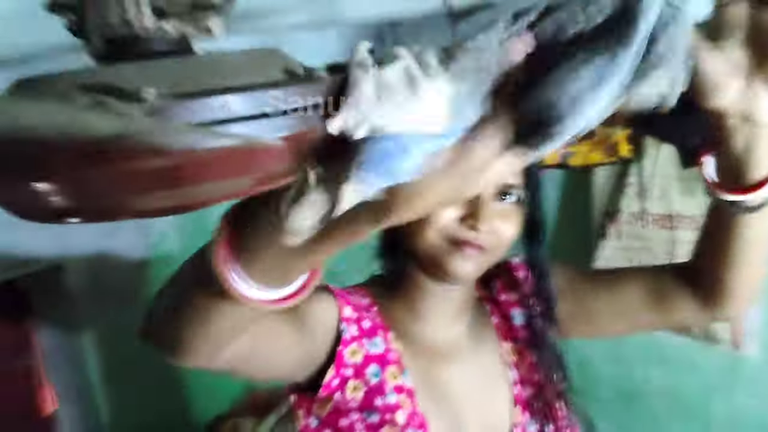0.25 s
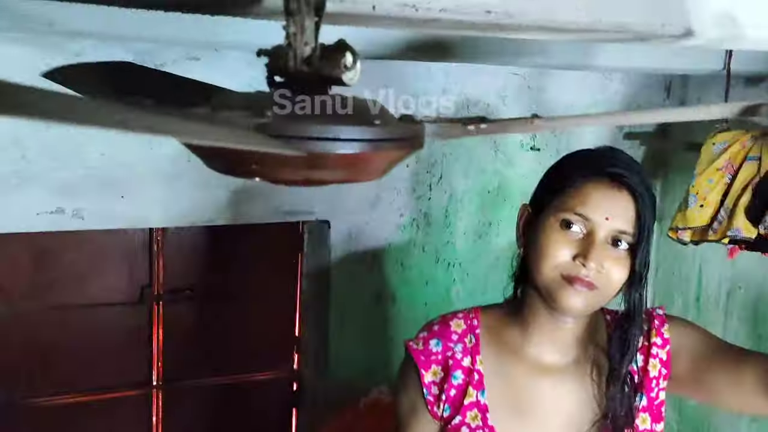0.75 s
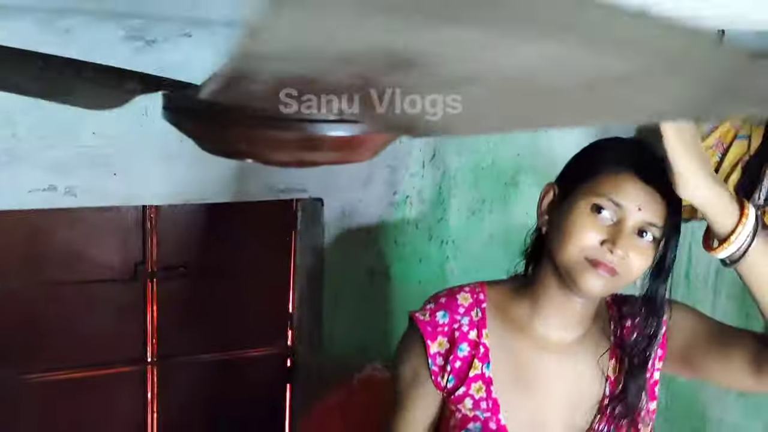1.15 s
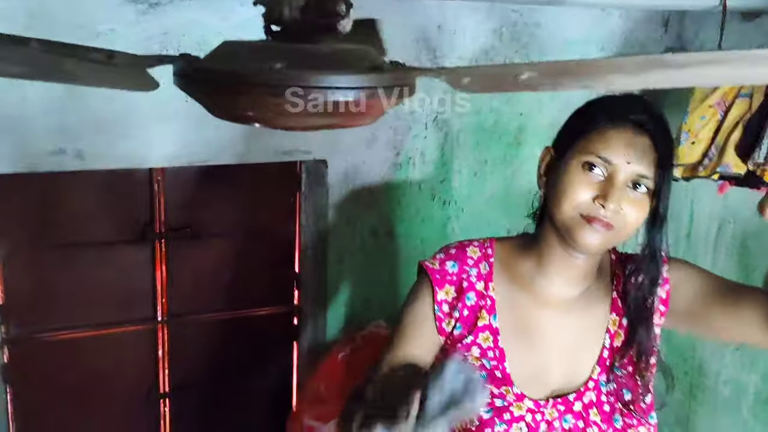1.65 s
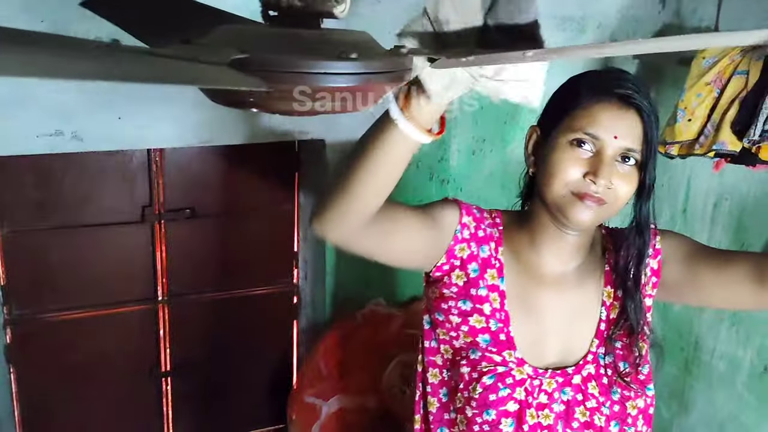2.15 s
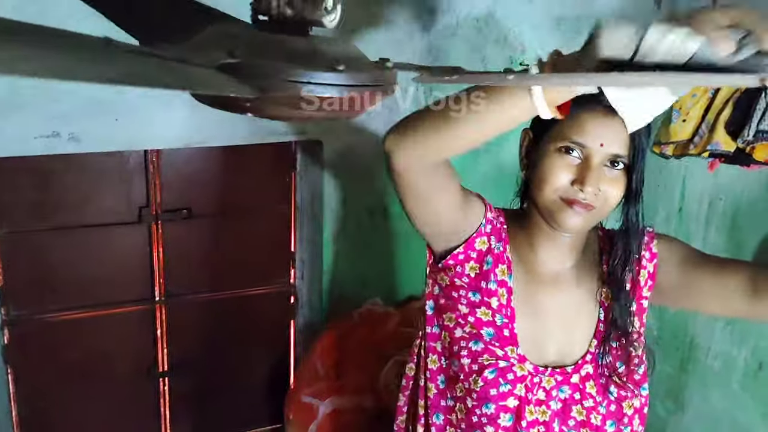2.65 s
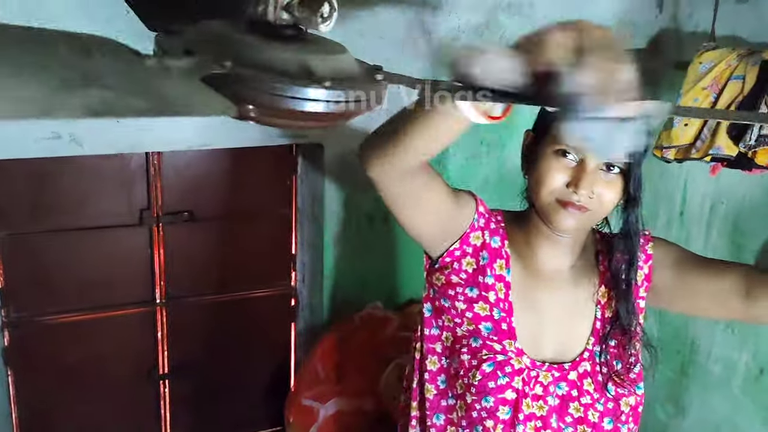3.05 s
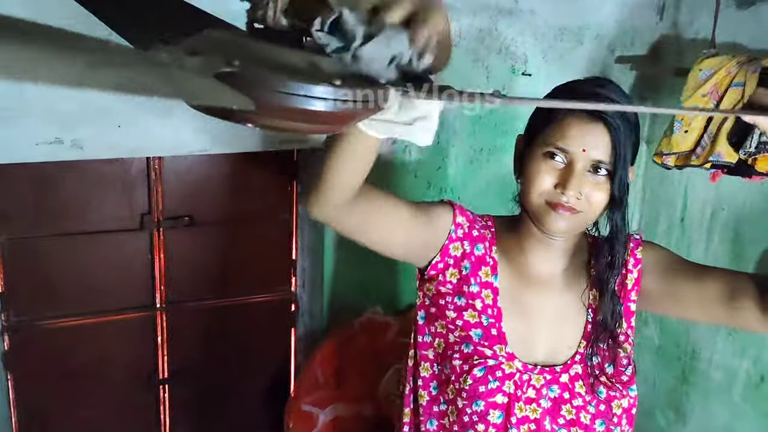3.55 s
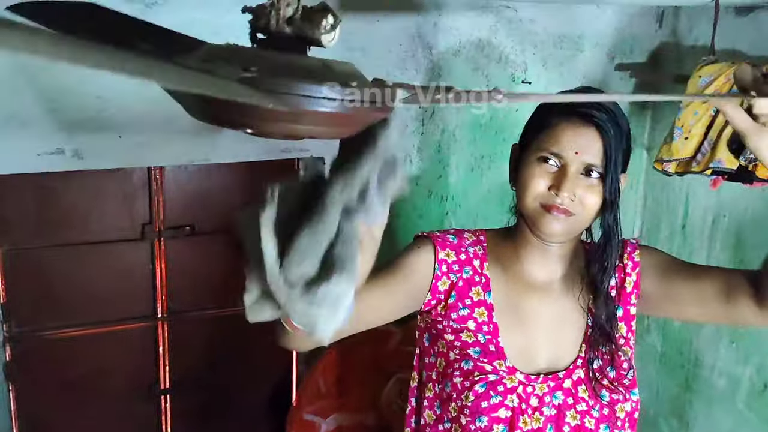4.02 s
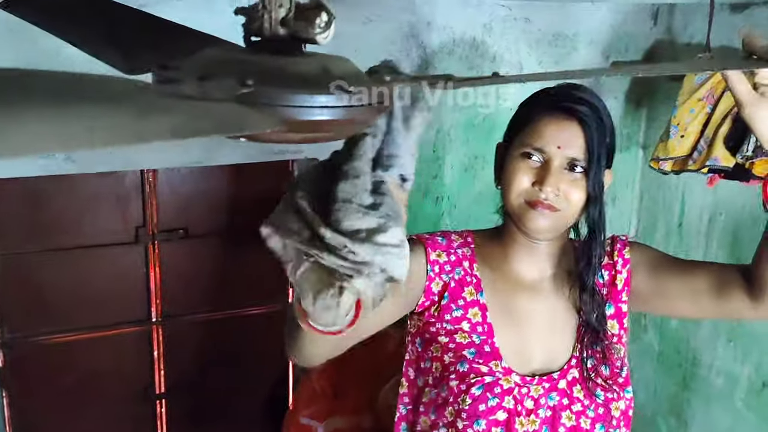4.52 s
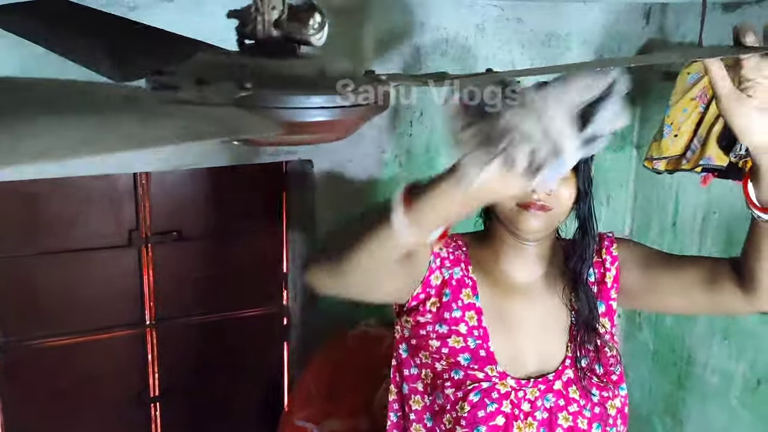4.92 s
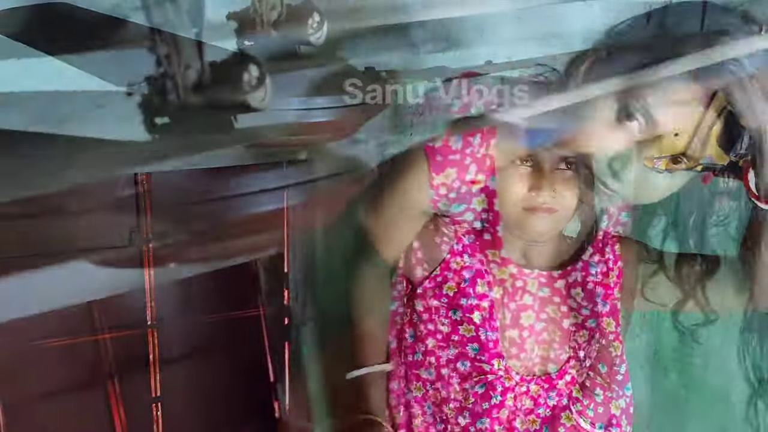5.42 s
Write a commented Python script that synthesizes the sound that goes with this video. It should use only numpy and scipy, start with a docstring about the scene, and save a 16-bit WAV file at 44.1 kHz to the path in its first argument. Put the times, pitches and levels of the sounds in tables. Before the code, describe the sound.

Close, gritty cloth wiping on thin metal blades, interrupted by a hard jolt, light pats, rattling bangles, hollow knocks and tiny creaks.

```python
"""A dry cloth wipes the sheet-metal blades of a ceiling fan in a small room, close to a phone with two ports.
Catching fibres, as shaped noise, rasp and ring the blade from the start; early on, pushes ring the phone case.
Damped modes then make blade knocks, bangle clashes and dry ticks; the wiping moves to a second blade.
Light pats and a sine creak follow, then firmer strokes, more clashes, the hardest knocks and another creak.
Two faint falling whistles of a bird come near the end; noise-band rumble and a room hiss run throughout."""
import sys
import numpy as np
from scipy import signal
from scipy.fft import rfft, irfft
from scipy.io import wavfile
from scipy.ndimage import uniform_filter1d

SR = 44100
rng = np.random.default_rng(int(sys.argv[2]) if len(sys.argv) > 2 else 0)


def output_pcm(signal):
    """Save a mono or channel-first signal as 16-bit PCM at the path in sys.argv[1].

    Samples are clipped to [-1, 1] before scaling.
    """
    pcm = np.clip(np.atleast_2d(signal).T, -1, 1) * 32767
    wavfile.write(sys.argv[1], SR, np.round(pcm).astype(np.int16))


N = 250488
T = np.arange(N) / SR  # s

# cloth strokes: (full grip [s], hold [s], level at grip [dB], level at letting go [dB], release [dB/s],
# lowest blade ring [dB], second blade ring [dB], upper blade rings [dB], brightness [dB], hand weight [dB])
STROKES = [(0.057, 0.18, -43.5, -39, 295, -18, 1, 11, 4, -15),
           (0.382, .15, -44, -34.5, 1500, -11, 4, 6, 2.5, -14),
           (0.545, 0.041, -45.5, -45, 284, -12, -26, -2, 0.5, -11),
           (0.724, 0.098, -63, -54, 116, -3, -4, -13, 2, -10),
           (0.887, 0.068, -51, -43.5, 2499, -7, 2, 0, 0.5, -13),
           (2.253, 0.08, -65.5, -65, 102, -1, -5, -12, 1, -9.5),
           (2.425, 0.045, -69, -65, 150, 3, -18, -14, -3, 0),
           (2.716, 0.15, -54, -50, 287, 0.5, -7, -1, 0, -8.5),
           (3.037, .14, -45, -40, 256, -5.5, -31, -3, 2, -16),
           (3.346, 0.13, -47, -45.5, 256, -0.5, -13, -3, 1, -12),
           (3.678, 0.15, -42, -44, 395, -4, -17, 4, 4.5, -13.5),
           (4.16, .04, -43.5, -43, 198, 5, 4, -4, -1, -7),
           (4.25, 0.071, -36.5, -41.5, 326, 8.5, -4, 1.5, -4, -10),
           (4.437, 0.042, -64.5, -67, 200, 5, -21, 4, -2, -4),
           (4.584, 0.064, -67, -60, 157, 0.5, 0, -6, 0.5, -4),
           (4.834, 0.028, -64.5, -65, 202, 0, 8, 0, -2, -4),
           (5.024, 0.033, -77, -80.5, 149.5, -9, -1, 0, 5, -14),
           (5.104, .065, -68.5, -72, 300, -9, -4.5, 2, -4.5, -18),
           (5.244, 0.077, -66.5, -61, 150, 0, -8, 3, -0.5, -11),
           (5.365, 0.11, -49.5, -54, 254, -1, -24, 4.5, 0, -10),
           (5.633, .05, -55.5, -55.5, 250, -4, -26, 8, 1, -9.5)]
# rustle of the loose cloth between strokes: (time [s], level [dB])
RUSTLE = [(0, -54.5), (.94, -68.5), (.99, -96), (1.27, -75), (1.4, -80), (1.47, -69), (1.6, -87),
          (1.85, -84.5), (2.0, -74), (2.2, -91.5), (2.3, -81.5), (2.66, -68), (3.58, -82), (3.92, -63.5),
          (4.1, -71), (4.55, -86), (4.75, -74.5), (5.0, -90), (5.68, -68)]
# rustle colour: (lowest ring [dB], second ring [dB], upper rings [dB], brightness [dB], hand weight [dB])
RUSTLE_COLOUR_DB = (2.5, -12, -6, -1, 1.5)
# spectrum of the cloth rasp: (frequency [Hz], relative density [dB per Hz])
WEAVE_SPECTRUM = [(240, -47.5), (400, -18.5), (489, -38), (839, -11), (1060, -10), (1680, -6), (2090, -7.5),
                  (2710, -3.5), (3160, -7), (5270, -14.5), (7630, -31.5), (10700, -23.5), (16000, -40.5)]
# low blade modes under the cloth: (frequency [Hz], width [Hz])
BLADE_LOW_MODES = [(1320, 80), (1690, 65)]
# upper modes, one list per blade: (frequency [Hz], width [Hz], relative level [dB])
BLADE_UPPER_MODES = [
    [(2256, 20, -4.5), (2780, 220, 10), (3940, 28, -7), (4400, 42, -14), (4960, 170, -29),
     (5270, 54, -18.5), (6640, 13, -23.5)],
    [(2105, 105, 18.5), (2730, 160, -17.5), (4100, 13, 14), (4400, 60, -31), (4740, 18, -20),
     (5250, 27, -20)],
]
# level difference of the ports for the cloth: (frequency [Hz], left minus right [dB])
PORT_TILT = [(60, -5.5), (110, 9), (200, 3.5), (380, -1), (700, 2), (1290, -0.5), (2380, -8), (4400, 0),
             (8120, 10), (15000, -1)]
# likeness of the noise at the two ports: (frequency [Hz], correlation [-1 to 1])
PORT_LIKENESS = [(40, 0.63), (130, 0), (300, 0.81), (650, 0.41), (1300, 0.056), (16000, 0)]
# blade knocks: (time [s], level [dB], pitch [Hz], t60 [s], thud re knock [dB], left minus right [dB])
KNOCKS = [(0.955, -56.5, 790, 0.11, -17, -20), (3.841, -37, 796, 0.1, -14.5, -23),
          (4.1623, -34, 1318, 0.23, -22, -7), (4.177, -39, 1367, 0.054, -13, 19),
          (4.438, -57, 580, 0.12, -11, -11)]
# blade modes under a knock: (pitch ratio, relative level [dB], t60 ratio)
KNOCK_MODES = [(.36, -10, .5), (.66, -10, .5), (1, 0, 1), (2.84, -6, .35), (3.44, -20, .8)]
# dry ticks: (time [s], level [dB], centre [Hz], left minus right [dB])
TICKS = [(1.4589, -43.5, 3100, -18), (1.483, -44.5, 3400, -20), (4.7368, -53, 2900, -8)]
# bangle clashes: (time [s], level [dB], high re low rings [dB], low pitch [Hz], high pitch [Hz],
# rattle t60 [s], scrape weight [dB], left minus right [dB])
RATTLES = [(1.1827, -66, -5.5, 3560, 9960, 0.24, -12, 3), (1.91, -69, -16, 3850, 9440, 0.14, -3, -3),
           (1.938, -68, 17, 3480, 9680, 0.21, -23, 5), (1.981, -72, 14, 4080, 9910, 0.28, -15, 5),
           (2.051, -54, -18, 3870, 9550, 0.24, -8, 1), (2.585, -69, -13, 4040, 9960, 0.075, -12, 0.0),
           (2.6047, -56.5, 3, 4150, 9750, 0.2, -1, 3.5), (3.952, -58.5, -5.5, 3910, 9900, 0.18, -1, -2),
           (3.993, -53, -7, 3920, 10100, 0.2, -25, 3), (4.1234, -71, -12, 3900, 10600, 0.12, -16, 2),
           (4.1451, -50, 3.5, 3840, 9820, 0.28, -0.5, 6.5)]
# low hoop modes: (pitch ratio, relative level [dB], t60 [s])
BANGLE_LOW_MODES = [(.88, -14, .015), (1, 0, .03), (1.13, -9, .012), (1.6, -13, .015)]
# high hoop modes: (pitch ratio, relative level [dB], t60 [s])
BANGLE_HIGH_MODES = [(.74, -15, .012), (.96, -9, .01), (1, 0, .02), (1.06, -6, .01), (1.18, -8, .01),
                     (1.31, -11, .015), (1.48, -14, .012)]
# creaks of the blade on its arm: (time [s], length [s], first [Hz], last [Hz], level [dB])
CREAKS = [(2.433, 0.087, 591, 704, -62), (4.436, 0.073, 602, 684, -64.5)]
# bumps on the phone case: (time [s], level [dB], contact [s], port [0 left, 1 right], push 1 or pull -1)
JOLTS = [(.5293, -1.5, .0005, 0, 1), (.530, -12, .00035, 1, -1), (.5335, -15, .0007, 1, 1),
         (.536, -7, .003, 1, 1), (.5415, -22, .0005, 1, 1), (.547, -24, .003, 0, 1),
         (.551, -21, .003, 0, 1), (.558, -12, .0025, 0, 1), (1.258, -38, .008, 1, 1),
         (1.428, -38, .004, 1, 1)]
# case modes, one list per port (left, right): (frequency [Hz], level re push [dB], t60 [s])
CASE_MODES = [
    [(260, -19, 0.021), (428, -18.5, .03)],
    [(52.7, -1, 0.11), (140, -8, 0.024), (630, -11, .02), (960, -4, 0.024), (1650, 3.5, 0.012),
     (2300, -1, 0.015)],
]
# bird whistles: (time [s], length [s], first [Hz], last [Hz], level at the end [dB])
BIRD = [(4.92, .14, 5060, 4820, -83.5), (5.11, 0.11, 4800, 4630, -76.5)]
# rumble contour: (time [s], level [dB])
RUMBLE = [(0, -51), (.43, -56), (.62, -47.5), (1.03, -62), (1.4, -57.5), (1.75, -66.5), (2.3, -59.5),
          (3.04, -57), (3.5, -53), (4.33, -55.5), (4.9, -62.5), (5.68, -61.5)]
# spectrum of the room hiss: (frequency [Hz], relative density [dB per Hz])
ROOM_SPECTRUM = [(88, -41), (150, -9), (244, -7), (275, -12), (309, -4), (414, -13.5), (534, -16.5),
                 (730, -17), (3100, -30.5), (6390, -45.5), (16000, -45)]

ATTACK_DB_PER_S, ROUNDING_S = 351.5, 0.044  # of a full stroke with a slow release
LIGHT_DB, LIGHT_QUICKER = -58, 2.5  # strokes gripping under this level are pats that land more suddenly
NEXT_BLADE_S = 1.5
CLOTH_PAN_DB, SWAY_DB = -0.5, 0.5  # left minus right
BIRD_SWELL_DB = 7.5
ROOM_DB = -66.5
TOP_HZ = 15780


def undb(db):
    """Amplitude of a level in dB."""
    return 10 ** (np.asarray(db) / 20)


def unit(x):
    """Scale to an rms of 1."""
    return x / np.sqrt(np.mean(x ** 2))


def over_hz(table):
    """Read a (Hz, value) table at every spectrum bin, on a log frequency axis."""
    hz, value = np.transpose(table)
    bin_hz = np.arange(N // 2 + 1) * SR / N
    return np.interp(np.log(bin_hz + 1), np.log(hz), value)


def colour(x, table):
    """Filter by a (Hz, dB) table."""
    return irfft(rfft(x) * undb(over_hz(table)), N)


def band(x, hz, width_hz):
    """Pass one resonance."""
    return signal.lfilter(*signal.iirpeak(hz, hz / width_hz, SR), x)


def band_twice(x, hz, width_hz):
    """Pass one resonance with steeper skirts."""
    return band(band(x, hz, width_hz), hz, width_hz)


def walk(rate_hz):
    """Random levels held 1 / rate_hz and slewed twice; spread near 1."""
    hold = int(SR / rate_hz)
    steps = np.repeat(rng.standard_normal(N // hold + 1), hold)
    return 1.08 * uniform_filter1d(uniform_filter1d(steps, hold), hold)[:N]


def port_noise():
    """Noise at both ports, correlated by frequency as in PORT_LIKENESS."""
    likeness = np.clip(over_hz(PORT_LIKENESS), 0, 1)
    weights = np.sqrt([(1 + likeness) / 2, (1 - likeness) / 2])
    mid, side = rfft(rng.standard_normal((2, N))) * weights
    return irfft([mid + side, mid - side], N)


def pan(left_minus_right_db):
    """Left and right gains."""
    return undb(np.array([left_minus_right_db / 2, -left_minus_right_db / 2]))


def decay(t_s, t60_s):
    """Exponential fall of 60 dB in t60_s."""
    return np.exp(-np.log(1000) * t_s / t60_s)


def ring(hz, t60_s, rise_s=1e-4):
    """One damped mode, peak near 1."""
    t = T[:int(SR * (t60_s + 3 * rise_s)) + 8]
    envelope = (1 - np.exp(-t / rise_s)) * decay(t, t60_s)
    return np.sin(2 * np.pi * hz * t) * envelope / envelope.max()


def add(out, start_s, x):
    """Mix x into out from start_s."""
    i = int(start_s * SR)
    out[..., i:i + x.shape[-1]] += x[..., :out.shape[-1] - i]


def cloth():
    """Fibres catch in uneven bursts; each blade mode swells and fades as the cloth travels over its nodes."""
    power = grip()
    total_power = power.sum(0)
    colours = np.vstack([RUSTLE_COLOUR_DB, np.array(STROKES)[:, 5:]])
    first_db, second_db, upper_db, bright_db, hand_db = colours.T @ (power / total_power)

    catches = unit(undb(1.1 * walk(400) + 0.71 * walk(40))) * port_noise()
    rasp = thicket(colour(catches, WEAVE_SPECTRUM), 4.3)
    dull = signal.sosfilt(signal.butter(2, 4500, fs=SR, output="sos"), rasp)

    low_rings = 0
    for (hz, width_hz), db in zip(BLADE_LOW_MODES, (first_db, second_db)):
        mode = unit(band(band(catches, hz, width_hz), hz, 4 * width_hz))
        low_rings = low_rings + undb(db + 2.2 * walk(25.09)) * mode
    first_blade, second_blade = (upper_rings(catches, modes) for modes in BLADE_UPPER_MODES)
    upper = np.where(T < NEXT_BLADE_S, first_blade, second_blade)
    hand = unit(band_twice(catches, 310, 630))

    mix = undb(2.0) * (dull + undb(bright_db) * (rasp - dull))
    mix += undb(hand_db) * hand
    mix += undb(upper_db - 11.5) * upper
    mix += undb(-9.0) * low_rings
    return mix * np.sqrt(total_power) * pan(CLOTH_PAN_DB + SWAY_DB * walk(12))


def grip():
    """Power of the rustle and of each stroke: steady attack, sloping hold, release, corners rounded."""
    rows_db = [np.interp(T, *np.transpose(RUSTLE))]
    for grip_s, hold_s, first_db, last_db, release_db_per_s, *_ in STROKES:
        quick = LIGHT_QUICKER if first_db < LIGHT_DB else 1
        db = np.interp(T, (grip_s, grip_s + hold_s), (first_db, last_db))
        db += quick * ATTACK_DB_PER_S * np.minimum(T - grip_s, 0)
        db -= release_db_per_s * np.maximum(T - grip_s - hold_s, 0)
        rounding_s = ROUNDING_S * min(ATTACK_DB_PER_S / release_db_per_s, 1 / quick)
        rows_db.append(uniform_filter1d(db, max(int(rounding_s * SR), 1)))
    return undb(2 * np.maximum(rows_db, -200))  # twice the dB: power


def thicket(x, depth_db):
    """The thin sheet has a thicket of close modes that light up for a moment, one after another."""
    frames = signal.stft(x, nperseg=1024, noverlap=768)[2]
    lit = unit(uniform_filter1d(rng.standard_normal(frames.shape[1:]), size=12, axis=1))
    return unit(signal.istft(frames * undb(depth_db * lit), nperseg=1024, noverlap=768)[1][:, :N])


def upper_rings(catches, modes):
    """Upper modes of one blade, each wandering in level."""
    rings = 0
    for hz, width_hz, db in modes:
        rings = rings + undb(db + 2.7 * walk(20)) * unit(band(catches, hz, width_hz))
    return unit(rings)


def knocks():
    """A blow rings the blade modes over a dull thud of decaying band noise."""
    out = np.zeros((2, N))
    t = T[:SR // 10]
    for s, db, hz, t60_s, thud_db, pan_db in KNOCKS:
        thud = unit(band(rng.standard_normal((2, len(t))), 370, 260)) * np.exp(-t / 0.018)
        add(out, s, undb(db + thud_db) * pan(pan_db)[:, None] * thud)
        for ratio, mode_db, t60_ratio in KNOCK_MODES:
            mode = undb(db + mode_db) * ring(hz * ratio, t60_s * t60_ratio, 0.00085)
            add(out, s, np.outer(pan(pan_db), mode))
    return out


def ticks():
    """One short snap: a heavily damped mode and a lower one of opposite sign."""
    out = np.zeros((2, N))
    for s, db, hz, pan_db in TICKS:
        add(out, s, np.outer(pan(pan_db), -undb(db) * ring(hz, 0.0039, 2e-5)))
        add(out, s, np.outer(pan(pan_db), undb(db + 2.5) * ring(0.33 * hz, 0.0024, 2e-5)))
    return out


def bangles():
    """Each clash is a sharp contact and a dying shower of tiny ones that ring the hoops and scrape."""
    out = np.zeros((2, N))
    t = T[:SR // 4]
    for s, db, high_db, low_hz, high_hz, t60_s, scrape_db, pan_db in RATTLES:
        fade = decay(t, t60_s) * (1 + 0.5 * np.exp(-t / 0.0063))
        struck = rng.random(len(t)) < 5000 / SR  # about 5000 contacts per s
        contacts = 0.55 * fade * rng.standard_normal((2, len(t))) * struck
        contacts[:, 0] = 1.6
        hoops = ring_hoop(contacts, BANGLE_LOW_MODES, low_hz)
        hoops += undb(high_db) * ring_hoop(contacts, BANGLE_HIGH_MODES, high_hz)
        scrape = fade * band(rng.standard_normal((2, len(t))), 10500, 6000)
        clash = undb(-5.0) * hoops + undb(scrape_db + high_db) * scrape
        add(out, s, undb(db) * pan(pan_db)[:, None] * clash)
    return out


def ring_hoop(blows, modes, hz):
    """All modes of a hoop, each a little louder or softer by where it is struck."""
    body = np.zeros(SR // 4)
    for ratio, db, t60_s in modes:
        mode = ring(min(hz * ratio, .4 * SR), t60_s)
        add(body, 0, undb(db + 1.5 * rng.standard_normal()) * mode)
    return signal.fftconvolve(blows, body[None])[:, :blows.shape[1]]


def creaks():
    """A slipping joint: a sine of jittered phase and level that climbs as the blade bends."""
    out = np.zeros(N)
    for s, length_s, first_hz, last_hz, db in CREAKS:
        u = np.clip((T - s) / length_s, 0, 1)
        hz = first_hz + (last_hz - first_hz) * np.sqrt(u)
        phase = 2 * np.pi * np.cumsum(hz) / SR
        level = undb(db + 4.4 * walk(90)) * np.sin(np.pi * u) ** 0.32
        out += level * np.sin(phase + 2.4 * walk(60))
    return out


def walls(x, t60_s, db):
    """Add a short diffuse tail, other for each port."""
    t = T[:int(t60_s * SR)]
    tail = rng.standard_normal((2, len(t))) * decay(t, t60_s) * (t > .004)
    tail /= np.sqrt(np.sum(tail ** 2) / 2)
    return x + undb(db) * signal.fftconvolve(x, tail, axes=1)[:, :N]


def jolts():
    """A smooth push reaches the port and rings the case; only short contacts wake the high modes."""
    out = np.zeros((2, N))
    for s, db, contact_s, port, way in JOLTS:
        push = way * np.sin(np.pi * T[:int(contact_s * SR)] / contact_s) ** 2
        impulse = push / abs(push.sum())
        add(out[port], s, undb(db) * push)
        for hz, mode_db, t60_s in CASE_MODES[port]:
            add(out[port], s, undb(db + mode_db) * np.convolve(impulse, ring(hz, t60_s)))
    # the capsule vent lets the slowest pressure leak away
    return signal.sosfilt(signal.butter(2, 38, "high", fs=SR, output="sos"), out)


def bird():
    """Falling sine whistles that throb and swell."""
    out = np.zeros(N)
    throb = 1 + 0.58 * np.sin(2 * np.pi * 28 * T)
    for s, length_s, first_hz, last_hz, db in BIRD:
        u = np.clip((T - s) / length_s, 0, 1)
        on = uniform_filter1d(1. * (u > 0) * (u < 1), size=400)
        hz = first_hz + (last_hz - first_hz) * u + 25 * walk(60)
        level = undb(db - BIRD_SWELL_DB * (1 - u) + 2.5 * walk(50))
        out += on * throb * level * np.sin(2 * np.pi * np.cumsum(hz) / SR)
    return out


def rumble():
    """Lumpy low noise bands that follow the movement in the room."""
    lumps = 0
    for hz, db in ((34, -2.0), (55, -0.8), (90, -12.0), (150, -5.0)):
        lump = unit(band_twice(port_noise(), hz, 0.76 * hz))
        lumps = lumps + undb(db + 3.36 * walk(6.0)) * lump
    return lumps * undb(np.interp(T, *np.transpose(RUMBLE)))


def room_hiss():
    """Smooth coloured noise, wavering slightly in level."""
    return unit(colour(port_noise(), ROOM_SPECTRUM)) * undb(ROOM_DB + 1.1 * walk(17))


def scene():
    """Blade and bangle sounds get the room tail; bumps, bird and background stay without it."""
    rub = irfft(rfft(cloth()) * pan(over_hz(PORT_TILT)), N)
    near = rub + knocks() + ticks() + bangles() + creaks()
    return walls(near, 0.062, -11.0) + jolts() + bird() + rumble() + room_hiss()


def record(dry):
    """The phone cuts the top."""
    return signal.sosfilt(signal.ellip(10, .2, 70, TOP_HZ, fs=SR, output="sos"), dry)


dry = scene()
out = record(dry)
output_pcm(out)
```